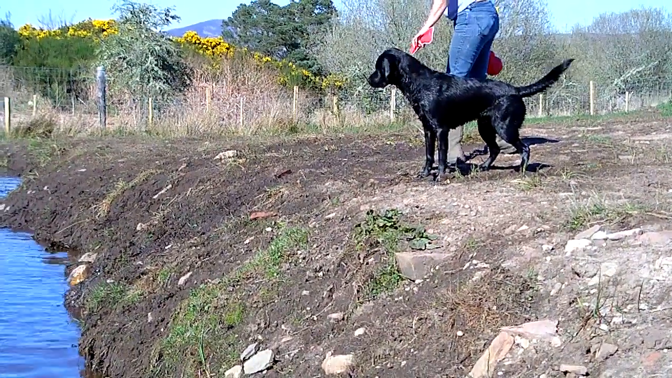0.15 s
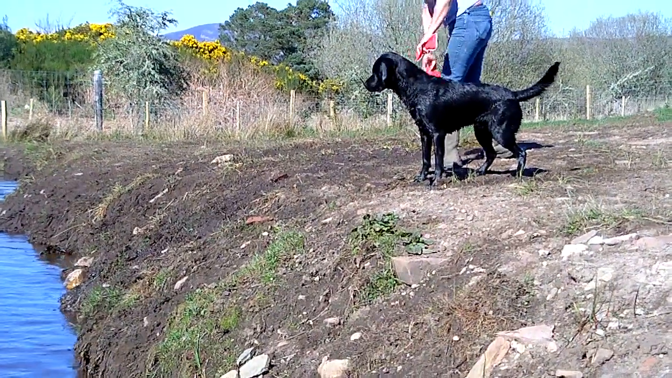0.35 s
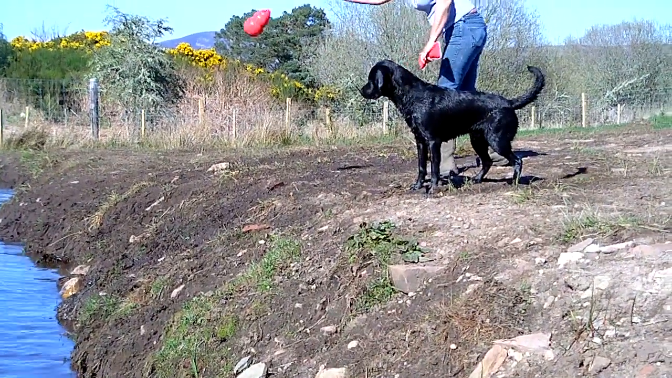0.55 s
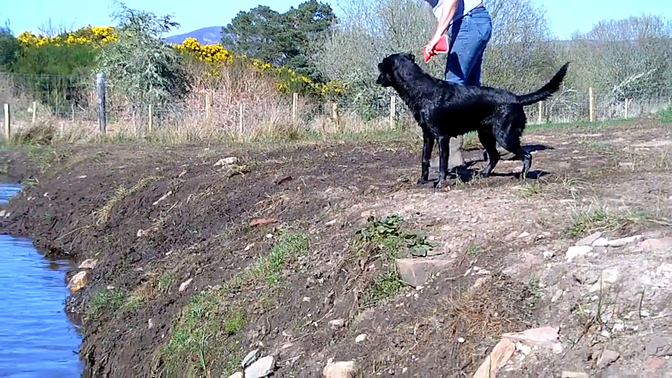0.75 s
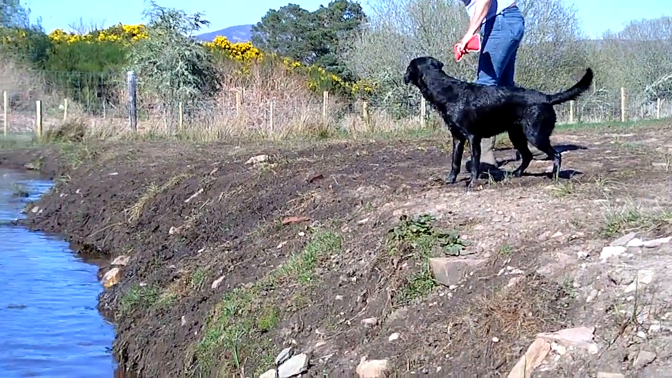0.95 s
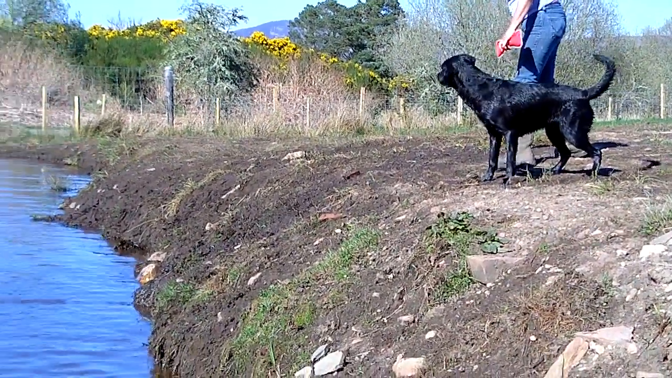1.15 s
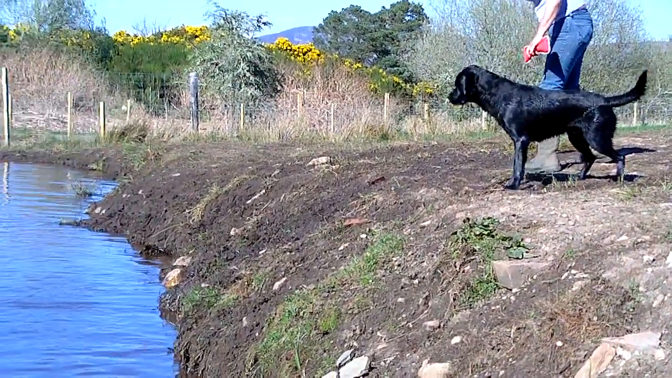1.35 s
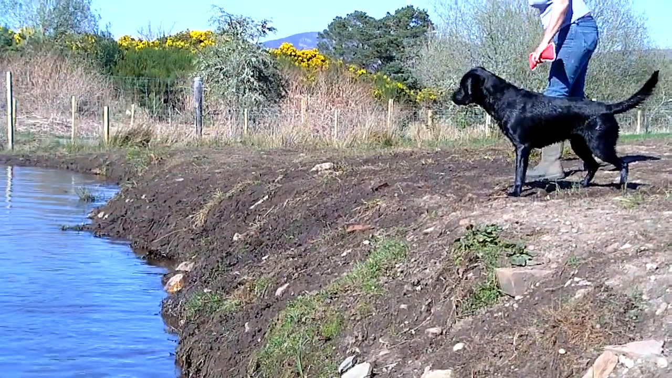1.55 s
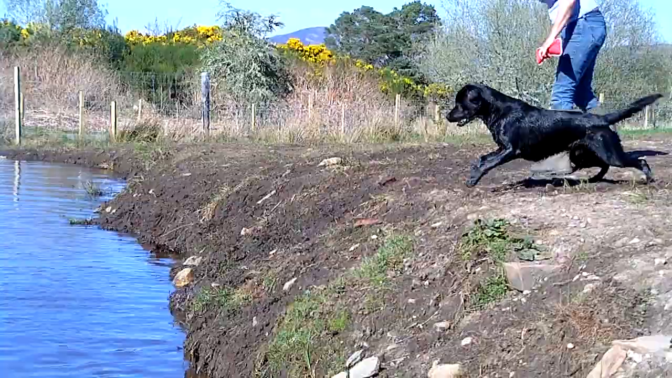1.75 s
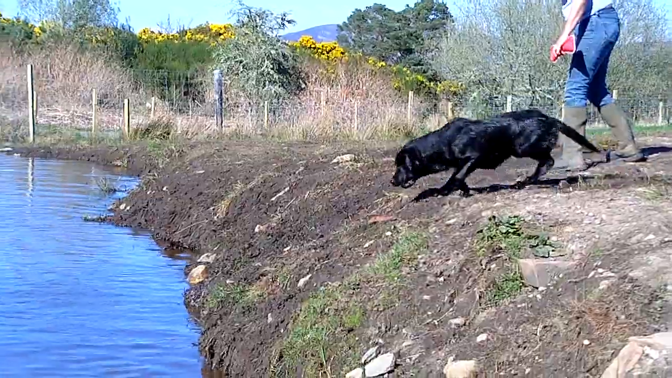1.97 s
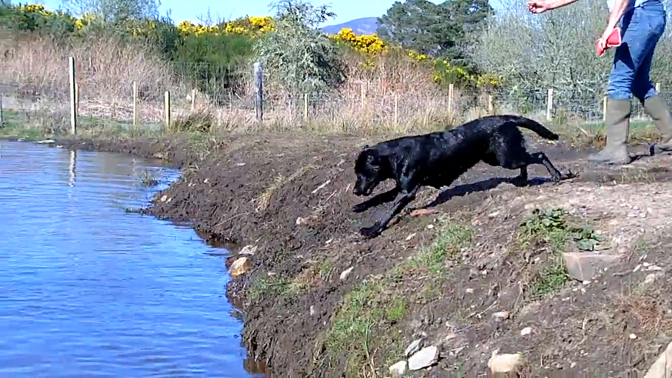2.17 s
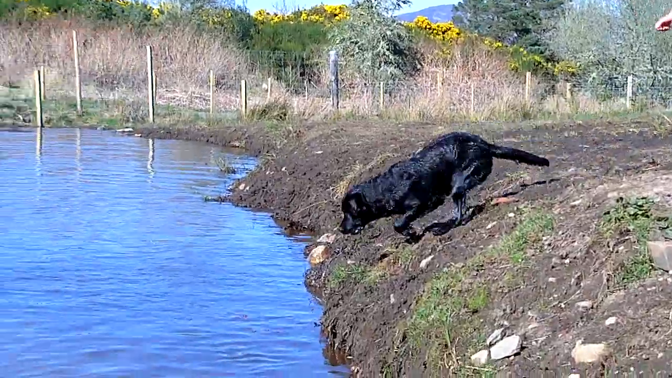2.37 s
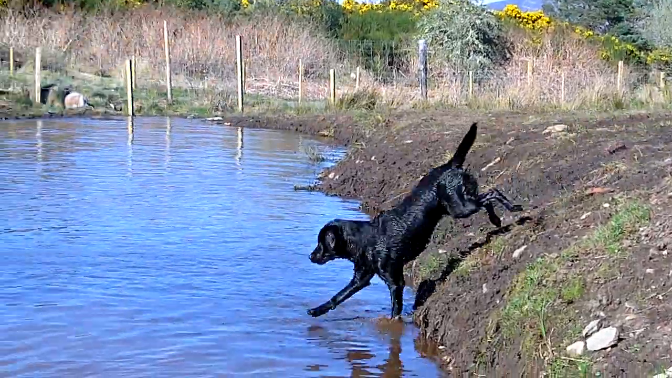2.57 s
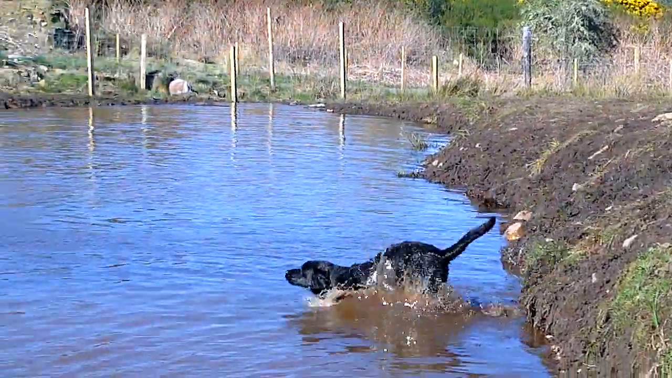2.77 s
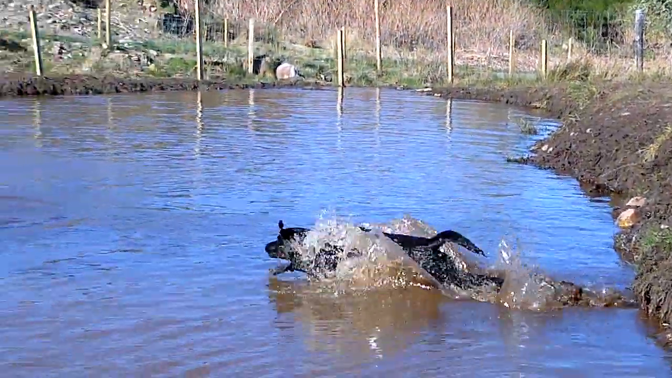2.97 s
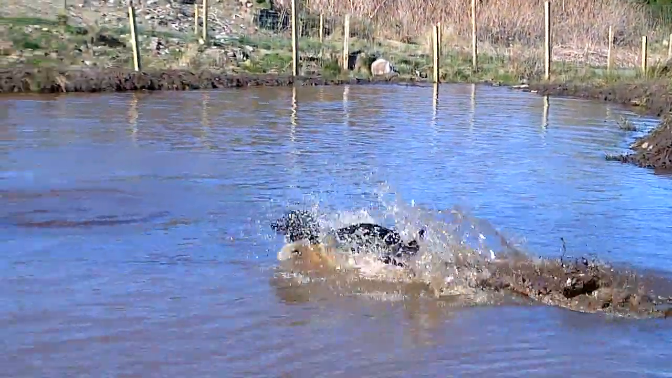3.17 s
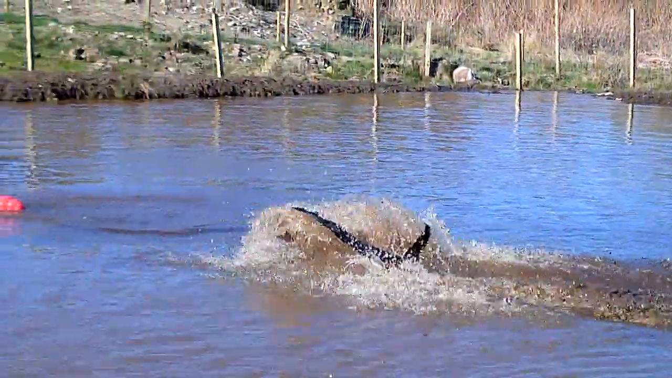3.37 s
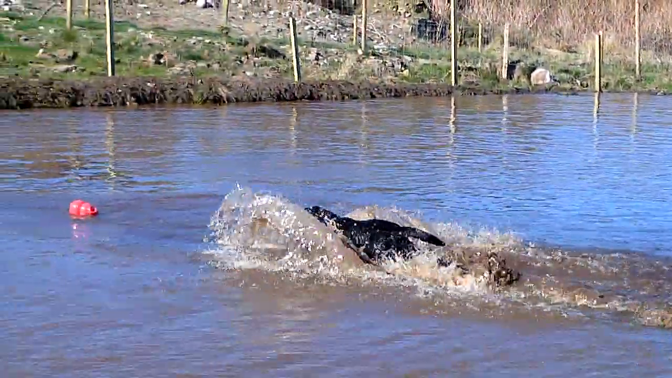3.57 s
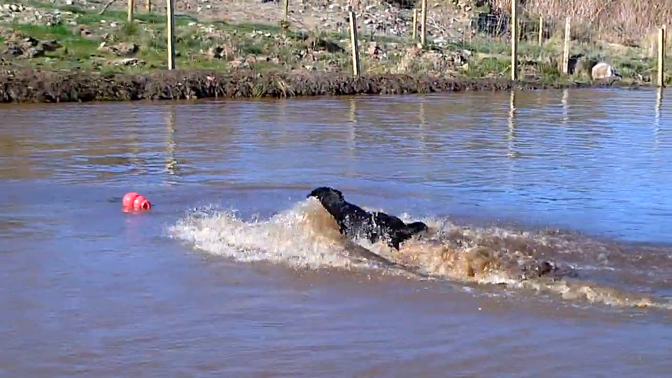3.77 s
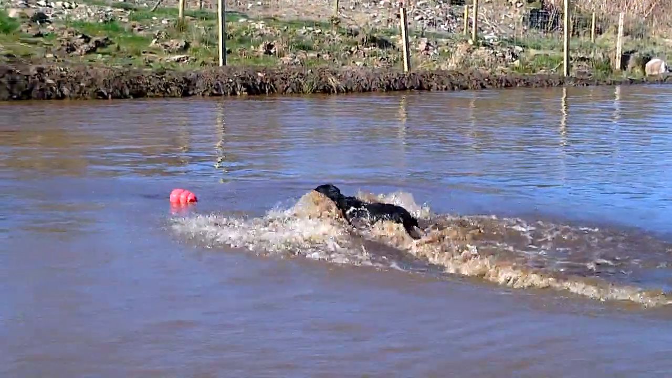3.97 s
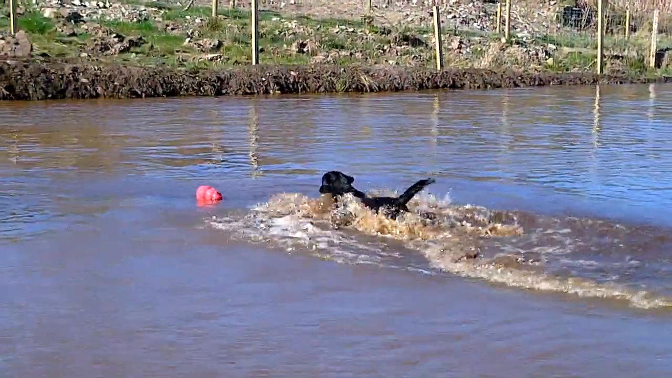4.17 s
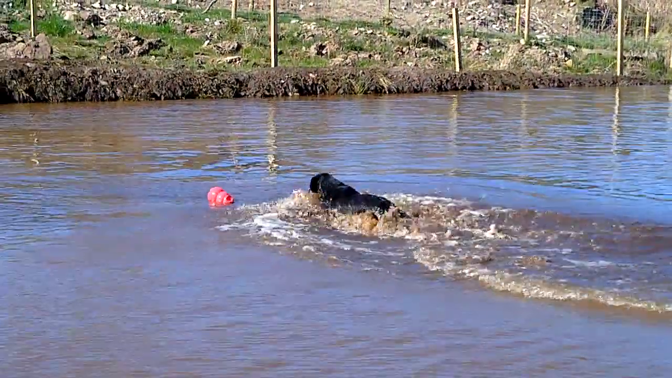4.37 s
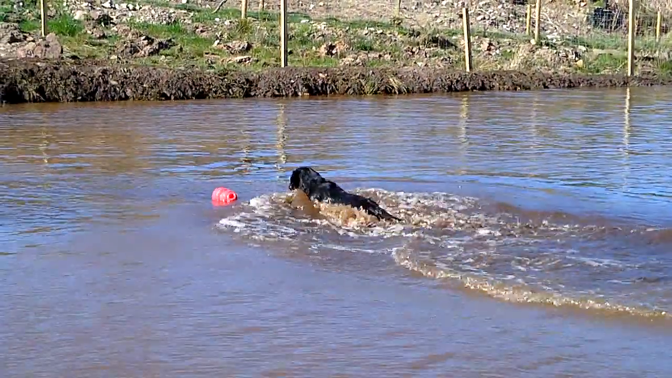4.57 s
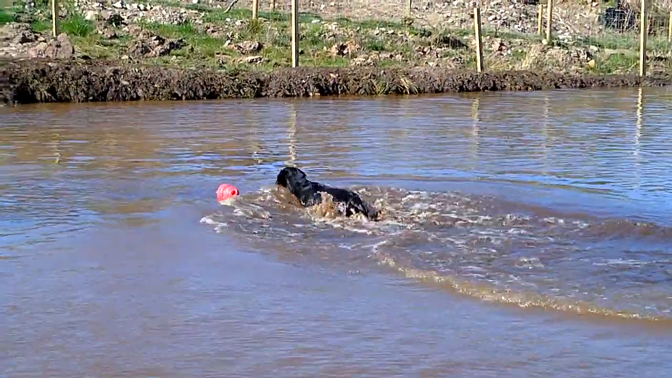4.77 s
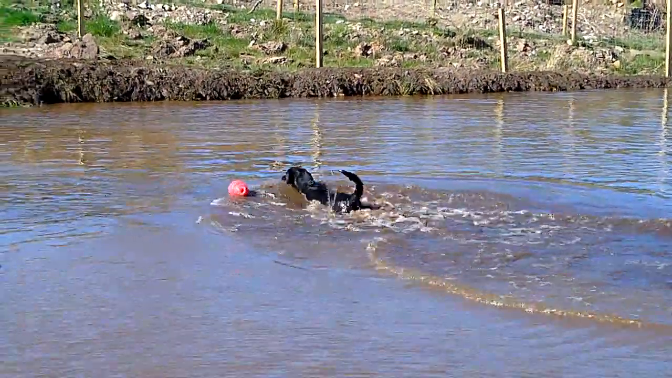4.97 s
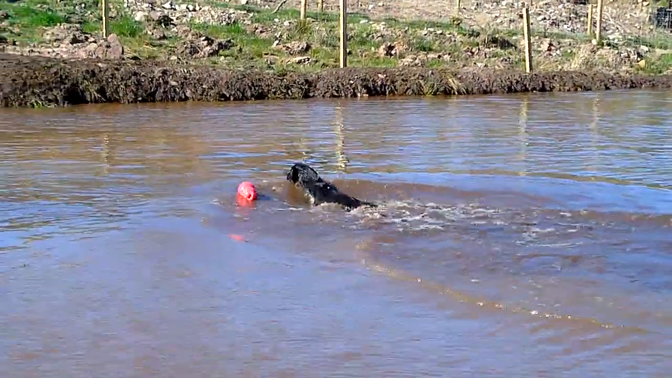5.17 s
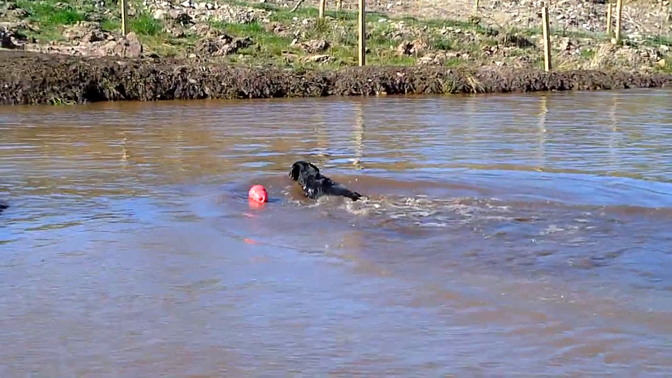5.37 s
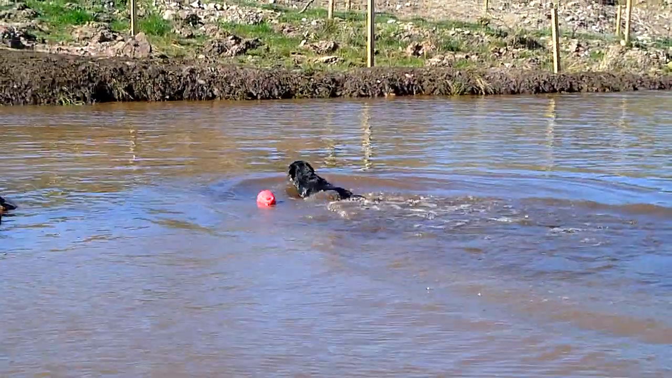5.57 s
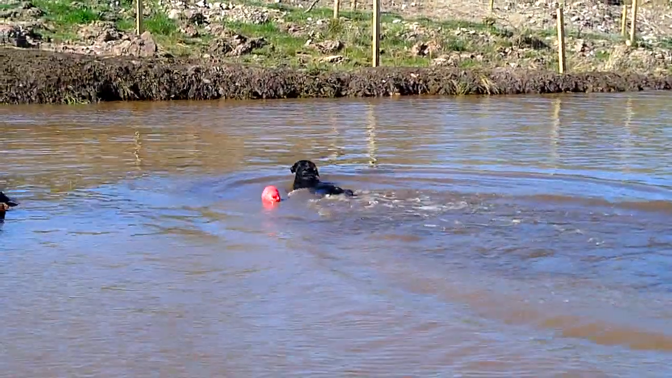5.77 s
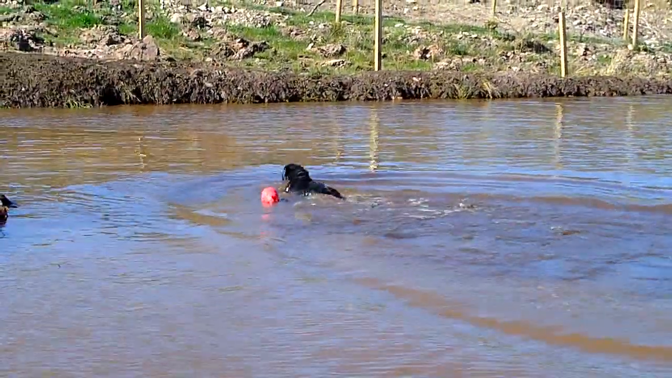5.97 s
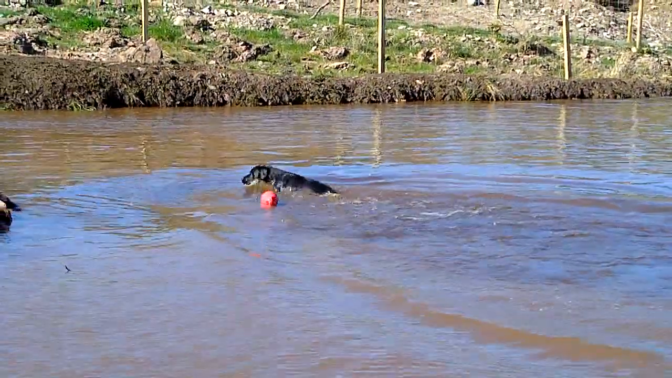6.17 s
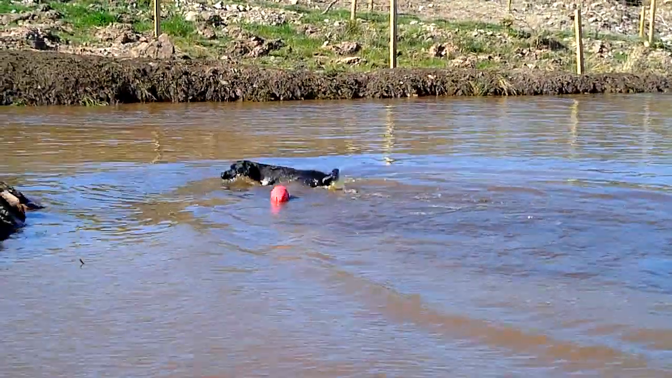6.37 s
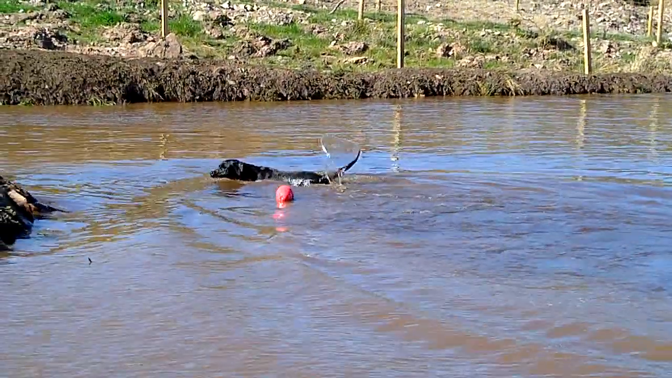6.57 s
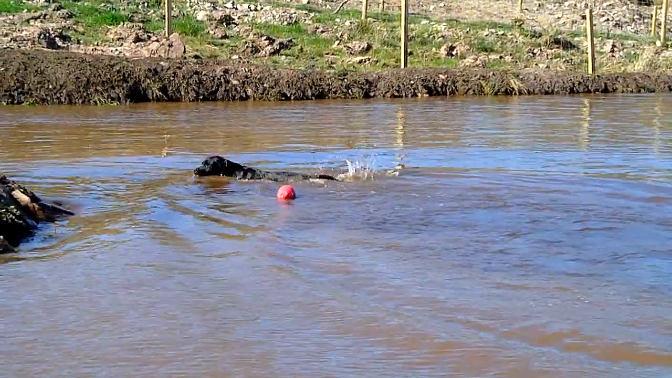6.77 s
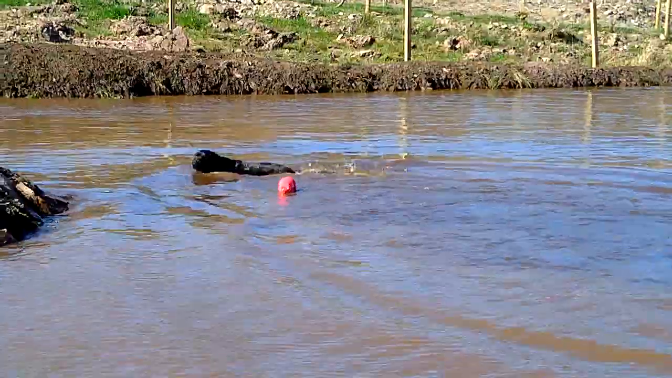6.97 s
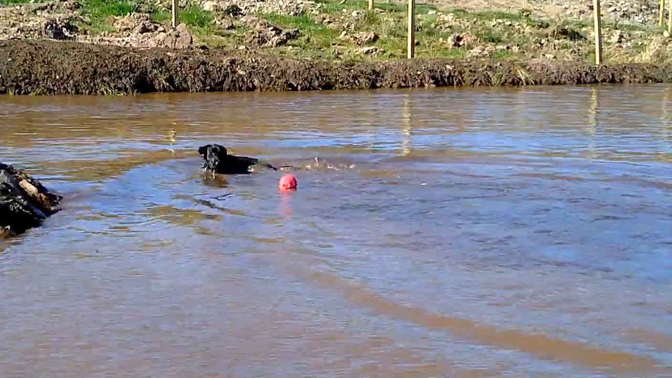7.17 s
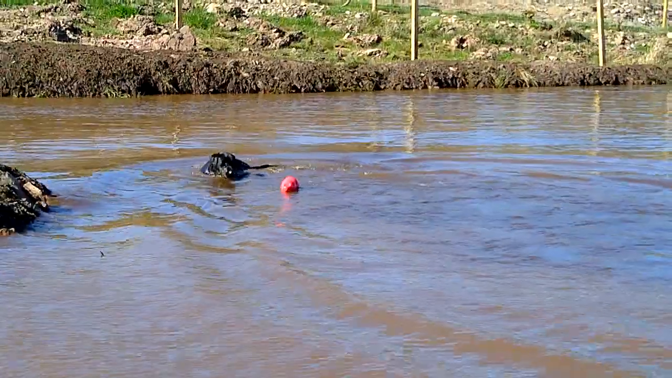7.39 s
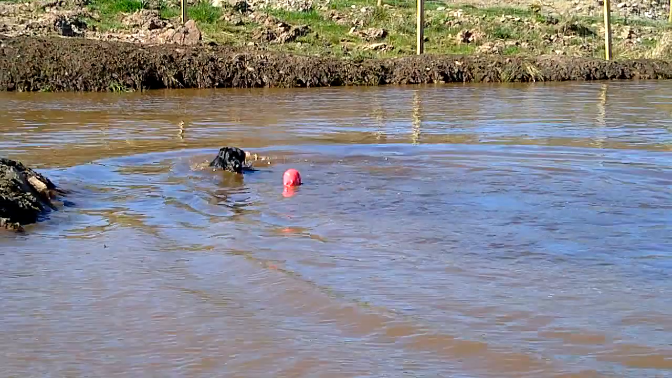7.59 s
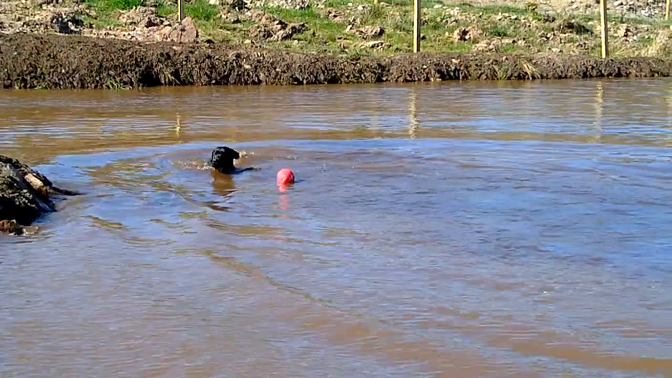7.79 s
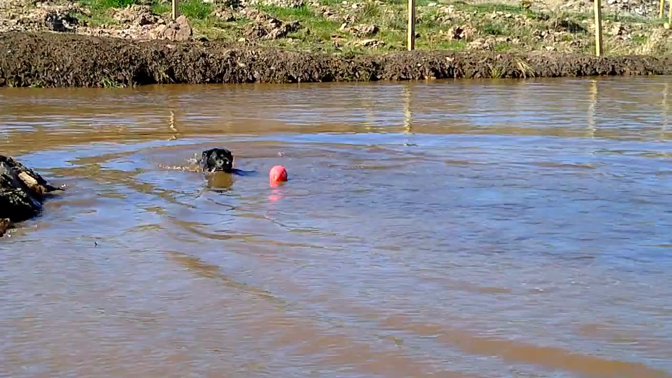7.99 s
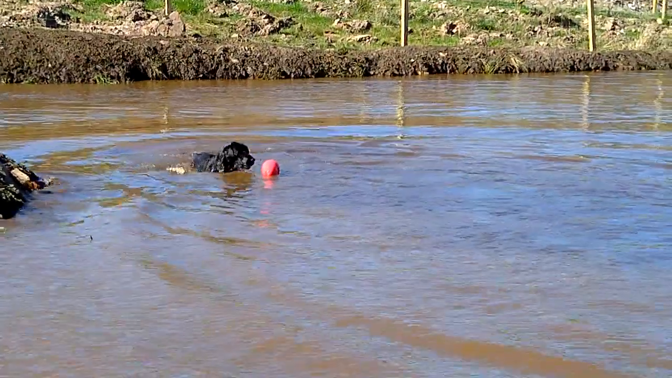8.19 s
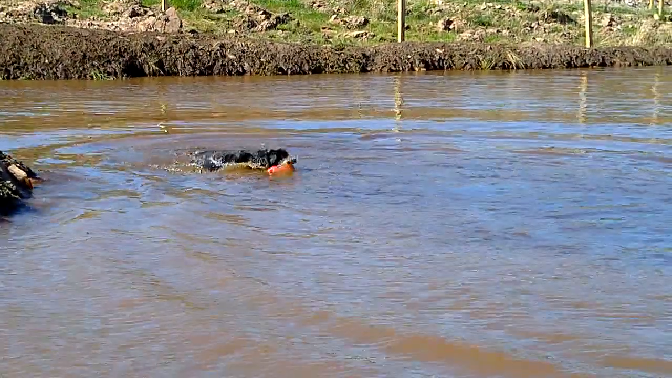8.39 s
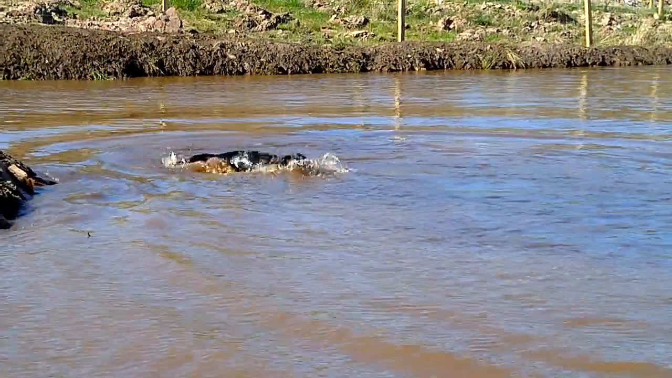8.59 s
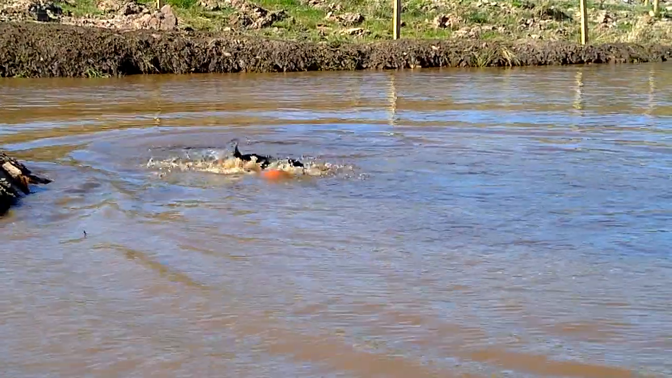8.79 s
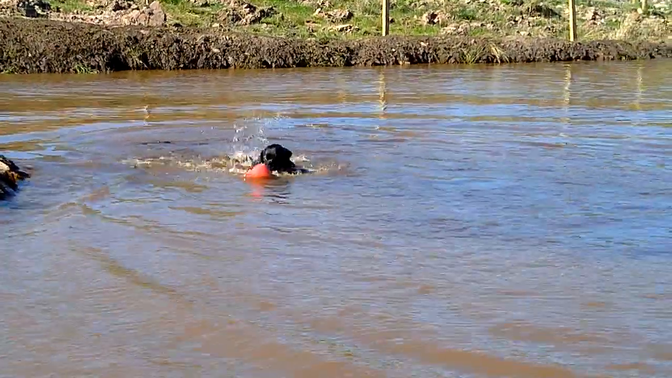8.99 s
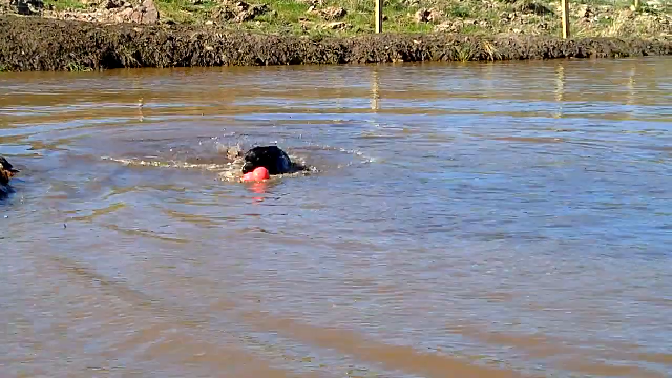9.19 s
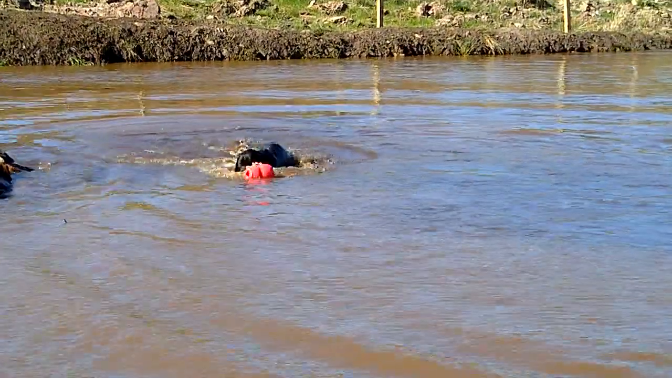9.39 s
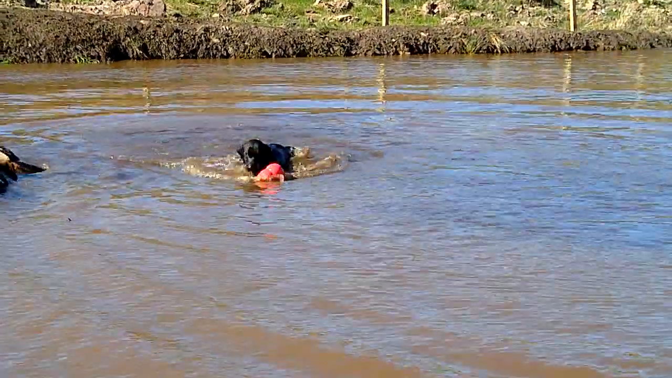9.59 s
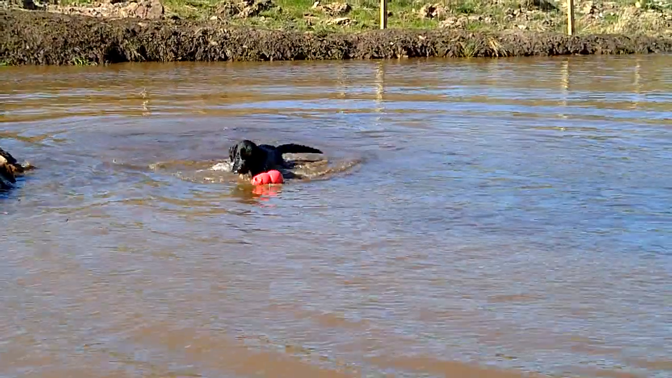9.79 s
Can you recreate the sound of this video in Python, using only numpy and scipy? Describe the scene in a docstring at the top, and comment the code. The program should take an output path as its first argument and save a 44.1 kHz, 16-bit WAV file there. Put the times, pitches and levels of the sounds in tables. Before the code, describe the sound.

A dog huffs close by, a thrown toy slaps water, another dog leaps in with heavy splashes and swims while a finch sings.

```python
"""A dog at a country pond; low rumble and thumps as the microphone is handled, and in light wind.
A second dog huffs near the microphone (breath noise through throat resonances); a warbler slurs and chips.
A thrown toy smacks the water; the first dog scrambles down the bank, plunges in and paddles about:
spray and churn are noise with resonant grains, slaps are cracked noise bursts, plops are dying sines.
The huffs return while the first dog swims; a finch's phrase and late high trills are gliding sines too."""
import sys
import numpy as np
from scipy import signal
from scipy.fft import rfft, irfft
from scipy.io import wavfile
from scipy.ndimage import uniform_filter1d

SR = 44100
rng = np.random.default_rng(int(sys.argv[2]) if len(sys.argv) > 2 else 0)


def digitize_waveform(pressure):
    """Quantize a signal to 16-bit integers and store it at the path in sys.argv[1].

    Rows of a 2-D input are taken as channels; values are limited to [-1, 1].
    """
    field = np.atleast_2d(pressure).T
    bounded = np.clip(field, -1, 1)
    quanta = np.round(bounded * 32767).astype(np.int16)
    wavfile.write(sys.argv[1], SR, quanta)


N = 433944


def amp(db):
    """dB to gain."""
    return 10 ** (np.asarray(db) / 20)


def rms_one(x):
    """Scale to rms 1."""
    return x / np.sqrt(np.mean(x ** 2) + 1e-20)


def in_time(rows):
    """Columns of a curve table at every sample."""
    s, *columns = np.transpose(rows)
    return [np.interp(np.arange(N) / SR, s, c) for c in columns]


def drift(rate_hz):
    """Slow chance of spread 1: noise at every 20th sample through a double one-pole low-pass."""
    r = np.exp(-2 * np.pi * rate_hz * 20 / SR)
    noise = rng.standard_normal(N // 20 + 3002)
    slow = signal.lfilter([1], [1, -2 * r, r * r], noise)[3000:]   # settled part
    return np.interp(np.arange(N) / 20, np.arange(len(slow)), rms_one(slow - slow.mean()))


def narrow(hz, width_hz):
    """Noise in one moving resonance: slow chance on a carrier pair that follows the centre; rms near 1."""
    phase = 2 * np.pi * np.cumsum(hz) / SR
    return drift(width_hz)[:len(hz)] * np.cos(phase) + drift(width_hz)[:len(hz)] * np.sin(phase)


def colour(x, spectrum):
    """Causal (minimum-phase) filter with the given spectrum; result at rms 1."""
    hz, db = np.transpose(spectrum)
    grid_hz = np.maximum(np.arange(4097) * SR / 8192, 5)
    cepstrum = irfft(np.log(amp(np.interp(np.log(grid_hz), np.log(hz), db))))
    cepstrum[1:4096] *= 2   # fold onto positive time
    cepstrum[4097:] = 0
    response = irfft(np.exp(rfft(cepstrum)))
    return rms_one(signal.fftconvolve(x, response)[:N])


def grains(per_s, spread_db, low_hz, high_hz, cycles, count):
    """Random clicks of uneven size, dealt to resonators spread in log pitch; flat power per Hz."""
    sizes = amp(spread_db * np.minimum(rng.exponential(1, N), 5)) * rng.choice([-1, 1], N)
    clicks = sizes * (rng.random(N) < per_s / SR)
    dealt = rng.integers(0, count, N)
    out = 0
    for k, hz in enumerate(np.geomspace(low_hz, high_hz, count)):
        r = amp(-60 * hz / cycles / SR)   # 60 dB down after the given cycles
        w = 2 * np.pi * hz / SR
        ring = signal.lfilter([1], [1, -2 * r * np.cos(w), r * r], clicks * (dealt == k) + 1e-18)
        out = out + hz / high_hz * ring * np.sin(w)
    return rms_one(out)


def add(out, s, hz, gain):
    """Mix in a sine that follows a pitch and a gain curve from time s."""
    i = round(s * SR)
    out[i:i + len(hz)] += gain * np.sin(2 * np.pi * np.cumsum(hz) / SR)


def swell(start_s, end_s, rise_s, fall_s):
    """dB shape: 0 between start and end, 10 dB down for each rise time before and fall time after."""
    t = np.arange(N) / SR
    return -10 * (np.maximum(start_s - t, 0) / rise_s + np.maximum(t - end_s, 0) / fall_s)


def background():
    """Air hiss with a lumpy deep end, handling thumps and wind gusts in two noise bands, two flickering tones."""
    # Spectra. Each row: frequency in Hz, relative level in dB per Hz.
    air_spectrum, lower_spectrum, upper_spectrum = [(12, -20), (20, 6.5), (70, -14), (319, -22),
                                                    (485, -24.5), (802, -23.5), (897, -19), (1220, -24),
                                                    (1660, -26.5), (6360, -28.5), (7730, -45),
                                                    (10200, -33.5), (16000, -21.5)], [(50, -39), (110, -8.5), (190, 1.5),
                                                                 (260, -0.5), (340, -8.5), (500, -59)], [(200, -43), (340, 0.5),
                                                                               (450, 0.5), (650, -12.5),
                                                                               (850, -19), (1300, -38.5)]
    # Handling thumps and wind gusts. Each row: start in s, length in s, first level in dB, last level in dB,
    # upper rumble against it in dB.
    thumps_and_gusts = [(0.0, 0.087, -58, -59, 2), (0.113, 0.048, -52, -56.5, 1.5),
                        (0.177, 0.038, -53, -60, 6), (0.223, 0.21, -61.5, -63.5, -1.5),
                        (0.86, 0.052, -64, -77, -10), (1.255, 0.13, -62.5, -79, -4.5),
                        (1.535, 0.13, -63, -77, -8), (1.735, 0.073, -69, -54, -7),
                        (2.556, .06, -73, -80, -13), (2.745, 0.18, -63.5, -74, 6),
                        (2.88, 1.4, -75.5, -77, 2), (4.77, 0.19, -76, -75, -16),
                        (5.213, 0.034, -53, -61, -6), (5.263, 0.44, -69, -78, -10),
                        (5.745, 0.1, -60.5, -74, -1.5), (6.423, 0.33, -69, -77, -5),
                        (7.031, 0.065, -66, -76, -4), (7.12, 0.41, -77, -68, -11),
                        (7.456, 0.5, -63, -78.5, -2), (8.2, 0.48, -80, -71, -6),
                        (8.904, 0.74, -64, -72.5, -2), (9.737, 0.11, -63, -72, -2)]
    # Flickering tones. Each row: frequency in Hz, mean level in dB.
    whine = [(7750, -81.5), (3820, -83)]
    air_db, calm_db = -63.5, -86
    deep_hz, lumps_db, lumps_rate_hz = 94, 4.0, 3.6
    rumble_rise_s, rumble_fall_s = 0.0066, 0.023   # for 10 dB

    air = amp(air_db) * colour(rng.standard_normal(N), air_spectrum)
    deep = signal.sosfilt(signal.butter(2, deep_hz, fs=SR, output="sos"), air)
    air = air + (amp(lumps_db * drift(lumps_rate_hz) + 0.5) - 1) * deep

    lower, upper = np.full((2, N), amp(2 * calm_db))   # powers
    for s, length_s, first_db, last_db, upper_db in thumps_and_gusts:
        level_db = np.interp(np.arange(N) / SR, [s, s + length_s], [first_db, last_db])
        power = amp(2 * (level_db + swell(s, s + length_s, rumble_rise_s, rumble_fall_s)))
        lower = lower + power
        upper = upper + amp(2 * upper_db) * power
    rumble = np.sqrt(lower) * colour(rng.standard_normal(N), lower_spectrum)
    rumble = rumble + np.sqrt(upper) * colour(rng.standard_normal(N), upper_spectrum)

    flicker_db = 3.5 * drift(20)
    tones = sum(amp(db + flicker_db) * narrow(np.full(N, hz), 40.) for hz, db in whine)
    return air + amp(3.15 * drift(25.0)) * rumble + tones


def birds():
    """Near-pure whistles with short fades and flickering level, and a faint echo off the far bank."""
    # Warbler's slurs and chips. Each row: start in s, length in s, start pitch in Hz, end pitch in Hz,
    # arch above the straight glide in Hz, level in dB.
    whistles = [(0.803, .026, 4380, 5500, 50, -72), (0.829, .06, 5470, 6200, -80, -78),
                (0.96, .095, 7800, 5450, -100, -71), (0.975, 0.075, 4250, 4900, 200, -75),
                (1.07, .035, 4500, 3900, 10, -74), (1.152, 0.22, 3290, 4390, 233.5, -68),
                (1.405, 0.14, 4220, 4150, 300, -80), (1.478, .058, 7750, 6350, 60, -68),
                (1.662, 0.1, 3290, 4200, 28, -71), (2.374, .012, 3200, 2900, -4, -61),
                (2.435, .011, 4400, 4700, 0, -59), (2.466, .014, 3900, 3750, 0, -66),
                (2.485, 0.0085, 5200, 4730, 0, -58), (2.496, .009, 3900, 3320, 0, -59),
                (2.518, .012, 4900, 4600, 0, -63), (2.534, .01, 5000, 5500, 0, -63),
                (2.552, 0.014, 4640, 4170, 0, -57), (6.99, 0.036, 3370, 3900, -1000, -69),
                (7.156, 0.03, 3400, 3920, -1100, -68), (8.545, .045, 3400, 3730, 0, -64),
                (8.64, 0.055, 3480, 3880, 2, -58)]
    # High trills. Each row: start in s, turns, centre in Hz, swing in Hz, level of low notes in dB.
    trills = [(9.257, 1.4, 7650, 280, -57), (9.308, 2.5, 7360, 280, -56), (9.468, 1.5, 7650, 380, -60),
              (9.526, 1.5, 7600, 220, -62)]
    # Finch's phrase, three notes. Each row: time from phrase start in s, pitch in Hz, relative level in dB.
    phrase = [
        [(-.034, 2800, -16), (-.022, 2960, -9), (-.01, 3120, -13)],
        [(0, 3600, -2), (.008, 4540, -2), (.022, 4560, -9)],
        [(.04, 4960, -2.5), (.052, 4300, 0), (.062, 3560, 2), (.075, 3540, -4.5), (.086, 3750, -3)],
    ]
    # Phrase repeats. Each row: start in s, level in dB.
    phrases = [(5.82, -67.5), (5.993, -62.5), (6.162, -62), (6.335, -58), (6.512, -59)]
    # Finch's closing note. Each row: time from its start in s, pitch in Hz, relative level in dB.
    arch = [(0, 3000, -12), (.012, 3540, -2), (.025, 3450, -6), (.04, 2850, -9)]
    # Closing note repeats. Each row: start in s, pitch ratio, level in dB.
    arches = [(6.712, 1.0, -56), (6.875, .96, -57.5), (7.2, 0.9, -60), (7.445, 0.86, -58.5)]
    whistle_ends_db = -3.5
    trill_turn_s, trill_top_db = .037, -2   # one turn down and up; high notes softer

    u = np.linspace(0, 1, 9)
    bow = np.sin(np.pi * u)
    notes = []
    for s, length_s, start_hz, end_hz, arch_hz, db in whistles:
        glide_hz = start_hz + (end_hz - start_hz) * u + arch_hz * bow
        notes.append(np.transpose([s + length_s * u, glide_hz, db + whistle_ends_db * (1 - bow)]))
    for s, turns, hz, swing_hz, db in trills:
        notes.append([(s + k * trill_turn_s / 2, hz + (-1) ** k * swing_hz, db + trill_top_db * (1 - k % 2))
                      for k in range(round(2 * turns) + 1)])
    notes += [np.add(note, [s, 0, db]) for s, db in phrases for note in phrase]
    notes += [np.multiply(arch, [1, ratio, 1]) + [s, 0, db] for s, ratio, db in arches]

    out = np.zeros(N)
    for note in notes:
        s, hz, db = np.transpose(note)
        t = np.arange(s[0], s[-1], 1 / SR)
        fade = np.clip(np.minimum(t - s[0], s[-1] - t) / 0.0008, 0, 1)
        pitch_hz = uniform_filter1d(np.interp(t, s, hz), size=200)
        add(out, s[0], pitch_hz, np.sqrt(2) * fade * amp(np.interp(t, s, db)))
    echo = amp(-15) * np.roll(out, round(0.024 * SR))
    return out * amp(2.6 * drift(40)) + echo


def huffs():
    """Second dog's breath: a hollow near-tone, sharp mouth and nose resonances and weaker upper ones of the throat."""
    # Huffs. Each row: peak in s, hollow tone in dB, breath in dB, mouth in Hz, mouth in dB, nose in dB,
    # extra hiss in dB.
    huff_rows = [(0.425, -49.5, -56.5, 2010, -52.5, -58, 3.5), (4.674, -60.5, -57, 2340, -45.5, -58, 10),
                 (5.441, -54, -61.5, 2286, -54, -58, 12), (8.772, -54, -56, 2180, -51, -62, 5.5)]
    # Course of one huff. Each row: time from peak in s, hollow tone in Hz, hollow tone in dB, breath in dB,
    # mouth pitch ratio, mouth in dB, nose in Hz, nose in dB; levels add to those of the huff.
    course = [(-.092, 405, -3, -24, 1.03, -21, 2650, -7), (-.058, 427, -1.5, -7, 1.04, -11.5, 2630, -2.5),
              (0, 475, 1, -1, 1.0, 2, 2590, -0.5), (.05, 482, -14, -13, 1.01, -21, 2600, -12),
              (.1, 470, -17, -38, 1.02, -19, 2620, -25), (.2, 480, -17, -16, 1.02, -26, 2620, -35)]
    # Throat resonances. Each row: frequency in Hz before throat_ratio, width in Hz likewise, level in dB.
    throat = [(1196, 370, 4), (3600, 210, 1.5), (4240, 240, -3), (5800, 400, -4), (7300, 530, -7.5)]
    throat_ratio = 0.947
    hollow_width_hz, mouth_width_hz = 71, 146

    out = np.zeros(N)
    s, *columns = np.transpose(course)
    t = np.arange(s[0], s[-1], 1 / SR)
    curves = [np.interp(t, s, c) for c in columns]
    hollow_hz, hollow_shape_db, breath_shape_db, mouth_ratio, mouth_shape_db, nose_hz, nose_shape_db = curves
    fade = np.clip(np.minimum(t - s[0], s[-1] - t) / 0.031, 0, 1)
    for peak_s, hollow_db, breath_db, mouth_hz, mouth_db, nose_db, hiss_db in huff_rows:
        air = rng.standard_normal(len(t)) * amp(0.74 * drift(70)[:len(t)])
        upper = 0
        for k, (hz, width_hz, db) in enumerate(throat):
            b, a = signal.iirpeak(hz * throat_ratio, hz / width_hz, fs=SR)
            upper = upper + (-1) ** k * amp(db) * signal.lfilter(b, a, air)
        breath = amp(breath_db + breath_shape_db + 7.0) * rms_one(upper)
        # teeth and lips brighten the huff
        hiss = signal.lfilter(*signal.butter(2, 4700, "high", fs=SR), breath)
        steady = np.sqrt(2) * np.cos(2 * np.pi * np.cumsum(hollow_hz) / SR)
        hollow = 0.81 * steady + 0.65 * narrow(hollow_hz, hollow_width_hz)
        breath += (amp(hiss_db) - 1) * hiss + amp(hollow_db + hollow_shape_db) * hollow
        breath += amp(mouth_db + mouth_shape_db) * narrow(mouth_hz * mouth_ratio, mouth_width_hz)
        breath += amp(nose_db + nose_shape_db) * narrow(nose_hz, mouth_width_hz)
        i = round((peak_s + s[0]) * SR)
        out[i:i + len(t)] += breath * fade
    return out


def plops():
    """A bubble rings as a dying sine that rises in pitch as it nears the surface."""
    # Each row: start in s, start pitch in Hz, rise in octaves per half t60, peak in dB, t60 in s.
    bubbles = [(1.565, 2160, 0.11, -35, 0.0058), (1.652, 1310, .1, -46.5, 0.022),
               (2.002, 670, 0.11, -49, 0.042), (2.574, 2530, 0.043, -29.5, 0.017),
               (2.791, 453, 0.073, -41.5, 0.13), (2.826, 1180, .1, -38, 0.056),
               (3.145, 475, 0.22, -41, 0.17), (3.175, 523, 0.092, -37, 0.08),
               (3.522, 407, 0.073, -44.5, 0.075), (5.24, 595, 0.17, -43, 0.018),
               (5.718, 2360, 0.9, -48.5, 0.024), (7.055, 1590, .1, -56, 0.041),
               (7.362, 2280, .1, -47, 0.024), (6.845, 1860, .2, -50, .03), (7.395, 1310, 4, -45.5, 0.063),
               (7.497, 636, 0.18, -49, 0.04), (7.66, 1350, .1, -51, .04), (7.628, 1430, .1, -52, 0.036),
               (7.72, 2340, .2, -44.5, 0.031), (8.836, 1760, 0.15, -41, 0.036),
               (9.135, 1955, .1, -33.5, 0.011), (9.322, 2080, .1, -39, 0.014),
               (9.583, 1027, 0.11, -46, 0.061)]
    out = np.zeros(N)
    for s, hz, rise, peak_db, t60_s in bubbles:
        t = np.arange(round(t60_s * SR)) / SR
        gain = amp(peak_db - 60 * t / t60_s) * np.minimum(t / 0.00071, 1)
        add(out, s, hz * 2 ** (rise * 2 * t / t60_s), gain)
    return out


def stir():
    """Levels of spray and churn in dB: surges add their power to the steady stir of water and loose soil."""
    # Steady stir. Each row: time in s, spray in dB, churn in dB.
    steady = [(0.0, -74, -67.5), (0.25, -73.5, -75), (1.47, -71, -77.5), (1.68, -66, -75),
              (1.77, -56.5, -60.5), (2.1, -52, -62.5), (2.25, -58, -63.5), (2.55, -64, -70.5),
              (2.7, -47, -62), (2.725, -48, -51.5), (2.93, -52, -51.5), (3.08, -43.5, -48.5),
              (3.7, -41.5, -49.5), (3.93, -47, -49), (4.3, -50.5, -52.5), (4.9, -57.5, -57),
              (5.15, -61, -65), (6.0, -65, -68.5), (7.25, -66, -75), (7.5, -69, -67), (8.0, -66, -71),
              (8.39, -60.5, -66.5), (8.55, -56, -57), (8.85, -54, -53), (9.05, -57, -60.5),
              (9.84, -65, -65)]
    # Surges from leaps, strokes and tail flicks. Each row: peak in s, spray in dB, churn in dB,
    # rise in s per 10 dB, fall in s per 10 dB.
    surges = [(0.08, -79, -69.5, 0.026, 0.027), (0.185, -86, -73, 0.042, .06),
              (1.539, -41, -45, 0.0028, .013), (1.55, -56, -57.5, .01, 0.073),
              (2.575, -56, -70, 0.014, .05), (2.644, -50.5, -63, 0.033, 0.15),
              (2.762, -37.5, -45.5, 0.015, 0.085), (2.83, -54, -51, 0.059, 0.16),
              (3.022, -27.5, -40, 0.0017, 0.013), (3.035, -41.5, -48.5, 0.067, 0.033),
              (3.258, -46, -49, 0.19, 0.039), (3.357, -40.5, -52, 0.056, 0.03),
              (3.557, -41.5, -56.5, 0.1, 0.16), (3.767, -36.5, -47.5, 0.058, 0.1),
              (4.259, -48, -57.5, 0.074, 0.088), (5.243, -64, -68, 0.053, 0.051),
              (5.927, -66, -60.5, 0.045, 0.024), (6.33, -60.5, -69, 0.065, .05),
              (6.415, -66, -62.5, .06, 0.074), (6.58, -67, -63, 0.045, 0.036),
              (6.689, -53.5, -65, 0.029, 0.056), (6.854, -58, -71, 0.1, 0.049),
              (7.054, -58.5, -61, .06, 0.098), (7.31, -56, -77, .03, 0.16),
              (7.493, -61.5, -62, 0.044, 0.19), (7.643, -60.5, -57.5, 0.066, 0.075),
              (7.817, -62.5, -64, .06, 0.086), (8.057, -67, -67, .05, 0.14),
              (8.356, -57, -61, 0.021, 0.032), (8.45, -46.5, -53.5, 0.028, 0.077),
              (8.76, -51.5, -62, 0.17, 0.081), (9.149, -62, -60.5, .04, 0.046),
              (9.389, -64, -68.5, 0.2, 0.023), (9.498, -58, -58, .06, 0.066),
              (9.653, -60.5, -68, 0.022, 0.098), (9.758, -64, -61.5, 0.093, .08)]
    power = amp(2 * np.array(in_time(steady)))
    for s, spray_db, churn_db, rise_s, fall_s in surges:
        power += amp([[2 * spray_db], [2 * churn_db]]) * amp(2 * swell(s, s, rise_s, fall_s))
    return 10 * np.log10(power)


def water(spray_db, churn_db):
    """Spray is fine crackle on hiss, churn is bubbles on noise; livelier water packs the grains denser."""
    # Spectra. Each row: frequency in Hz, relative level in dB per Hz.
    spray_spectrum, churn_spectrum = [(880, -29.5), (1500, -4.5), (2140, -2.5), (2610, -6), (3250, -10),
                                      (4120, -3), (5070, -7), (7240, -3.5), (8400, 0.5), (9370, -5),
                                      (12500, -15.5), (15100, -6.5), (16000, -80)], [(180, -53), (300, -14.5), (400, -5), (516, 0),
                                                     (680, -4.5), (796, -2), (896, -1.5), (1040, -1),
                                                     (1480, -0.5), (2770, -8), (4000, -4), (5200, -34),
                                                     (8800, -120)]
    spray_per_s = 250 + 6000 * amp(.8 * (spray_db + 45))
    churn_per_s = 120 + 5000 * amp(1.2 * (churn_db + 52))
    # dividing by the root of the rate keeps dense grains from growing louder
    crackle = grains(spray_per_s * amp(2.0 * drift(16)), 3.2, 2040, 10640, cycles=13.6, count=14)
    crackle = crackle / np.sqrt(spray_per_s)
    bubbles = grains(churn_per_s * amp(2.0 * drift(15)), 3.55, 364.4, 3660, cycles=24.0, count=20)
    bubbles = bubbles / np.sqrt(churn_per_s)
    spray = rng.standard_normal(N) + 0.72 * rms_one(crackle)
    churn = rng.standard_normal(N) + .9 * rms_one(bubbles)
    spray = amp(spray_db + 0.82 * drift(33.0)) * colour(spray, spray_spectrum)
    return spray + amp(churn_db + 0.33 * drift(7.6)) * colour(churn, churn_spectrum)


def slaps(spray_db):
    """Each slap is a sharp crack inside a noise burst that swells and dies, strongest in the band of its depth."""
    # Clearest slaps of paws, drops and pebbles. Each row: time in s, level before the final mix in dB,
    # depth (0 treble, 1 middle, 2 low).
    clear_slaps = [(0.0652, -40, 0.58), (0.0754, -39, 2.2), (0.0864, -50, 1.3), (0.23, -53, 1.2),
                   (0.8987, -45, 0.86), (0.9992, -43.5, 1.54), (1.0214, -43, 1.8), (1.066, -51, 1.1),
                   (1.365, -45.5, 0.82), (1.5276, -24, 0.36), (1.5343, -27.5, 1.9), (1.8158, -29, 0.2),
                   (1.8441, -35, 1.5), (1.8926, -42, -0.26), (1.9805, -38, 1), (2.0318, -37, 0.1),
                   (2.0542, -33, 1.13), (2.147, -42, 1.6), (2.185, -38, 0.92), (2.2218, -30.5, 1.58),
                   (2.2812, -41, 1.1), (2.4009, -37.5, 0.63), (2.4558, -42, 0.41), (2.4833, -44, 0.1),
                   (2.5675, -30, 1.14), (2.5722, -25.5, 0.63), (2.626, -33, 0.4), (2.632, -24.5, 0.62),
                   (2.7281, -27, 0.8), (2.7304, -18.5, 0.5), (2.753, -26, 0.34), (2.7587, -12, 0.54),
                   (2.764, -22, 0.51), (2.9407, -33.5, 0.3), (3.0213, -16, 0.3), (3.026, -22, -0.17),
                   (3.3424, -27, 0.4), (4.2742, -31, 1.3), (5.1047, -43, 1.9), (5.2048, -31.5, 0.55),
                   (5.24, -38.5, 2.43), (6.33, -39, 0.5), (6.4687, -43, 2.4), (6.6779, -25, 0.55),
                   (6.8403, -39, 0.86), (7.0334, -40, 0.0), (7.0578, -36.5, 1.35), (7.2938, -39, 0.71),
                   (7.3168, -33, 1.1), (7.3328, -36, 0.9), (7.363, -38.5, 0.46), (7.3873, -40, 0.66),
                   (7.4589, -40.5, 1.2), (7.6128, -38, 1.5), (7.8237, -43, 1.1), (8.0208, -46, 0.4),
                   (8.0686, -44, 1.2), (8.1194, -43.5, 0.17), (8.2846, -40, 0.87), (8.302, -34.5, -0.46),
                   (8.422, -35, 1.7), (8.436, -33, 0.54), (8.4516, -32, 0.93), (8.4754, -30, 0.44),
                   (8.572, -41, 0.47), (9.0457, -35.5, 0.32), (9.1358, -36.5, 1), (9.19, -41, 0.96),
                   (9.2804, -39, 1.5), (9.3242, -37, 1.4), (9.3548, -41, 0.73), (9.5136, -37, 0.1),
                   (9.598, -40, 1.4), (9.723, -41, 1.13), (9.769, -40, 0.82)]
    # Bands from treble to low. Each row: lower edge in Hz, upper edge in Hz.
    bands_hz = [(5280, 9480), (2600, 6300), (780, 2900)]
    rise_s, t60_s, crack_gain = .001, .018, 1.08
    narrow_db, broad_db = 16, -30   # loss one band off the depth, least share of any band
    # lesser drops: level at quiet spray, share of the spray's swing followed, scatter
    drop_count, drop_db, drop_follows, drop_spread_db = 45, -46.5, 0.9, 1
    quiet_spray_db = -62

    bursts, cracks = np.zeros((2, 3, N + SR))
    white = rng.choice([-1., 1.], N)
    t = np.arange(SR // 8) / SR
    shape = np.minimum(t / rise_s, 1) ** 2 * amp(-60 * np.maximum(t - rise_s, 0) / t60_s)
    drops = []
    for when, size, depth in rng.random((drop_count, 3)):
        swing_db = spray_db[int(when * N)] - quiet_spray_db
        level_db = drop_db + drop_follows * swing_db + drop_spread_db * (2 * size - 1)
        drops.append((0.011 + when * (N / SR - .02), level_db, 2 * depth))

    for s, level_db, depth in list(clear_slaps) + drops:
        shares_db = np.maximum(-narrow_db * (np.arange(3) - depth) ** 2, broad_db)
        gains = amp(level_db + shares_db)
        i = round((s - rise_s / 2) * SR)
        bursts[:, i:i + len(t)] += gains[:, None] * shape
        cracks[:, round((s + rise_s / 2) * SR)] += gains   # at the top of the swell

    out = 0
    for burst, crack, band in zip(bursts, cracks, bands_hz):
        sos = signal.butter(2, band, "band", fs=SR, output="sos")
        share = (band[1] - band[0]) / (SR / 2)   # levels the bands despite their widths
        source = 0.63 * burst[:N] * white / np.sqrt(share) + crack_gain * crack[:N] / share
        out = out + signal.sosfilt(sos, source + 1e-18)
    # spray rings strongest near 8.5 kHz, and again at the very top
    treble_peak = signal.lfilter(*signal.iirpeak(8500, 3.5, fs=SR), out)
    top = signal.lfilter(*signal.iirpeak(14800, 6.0, fs=SR), bursts[0, :N] * white)
    return 0.56 * out + 0.7 * treble_peak + .5 * top


def scene():
    """Everything at one microphone."""
    spray_db, churn_db = stir()
    return (water(spray_db, churn_db) + slaps(spray_db) + plops() + huffs() + birds() + background())[None]


def record(dry):
    """The deepest bass rolls off, two narrow dips follow, then the top is cut."""
    # Dips of the microphone housing. Each row: centre in Hz, width in Hz.
    notches = [(300, 77), (905, 118)]
    dry = signal.lfilter(*signal.butter(1, 25, "high", fs=SR), dry)
    for hz, width_hz in notches:
        dry = signal.lfilter(*signal.iirnotch(hz, hz / width_hz, fs=SR), dry)
    stop_edge_hz = 16008.5   # 60 dB down from here
    return signal.sosfilt(signal.cheby2(14, 60, stop_edge_hz, fs=SR, output="sos"), dry)


dry = scene()
out = record(dry)
digitize_waveform(out)
```